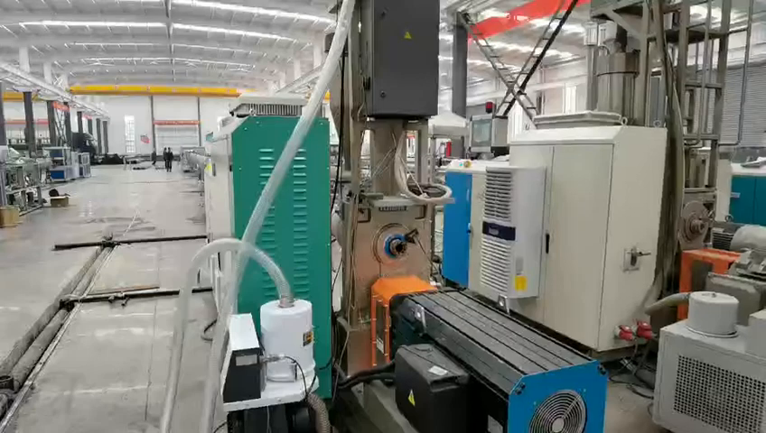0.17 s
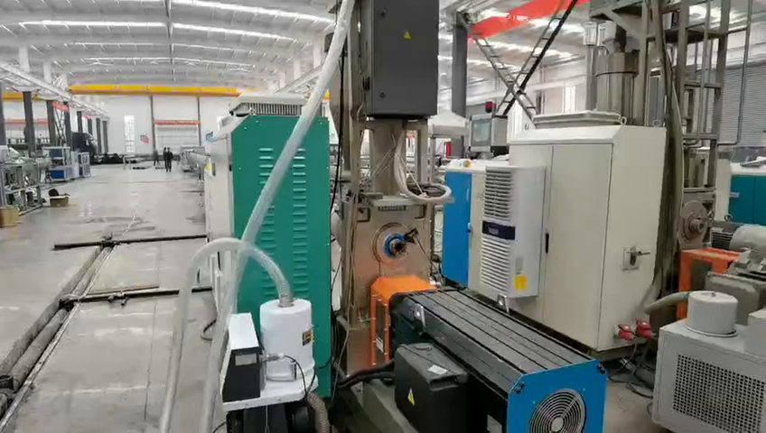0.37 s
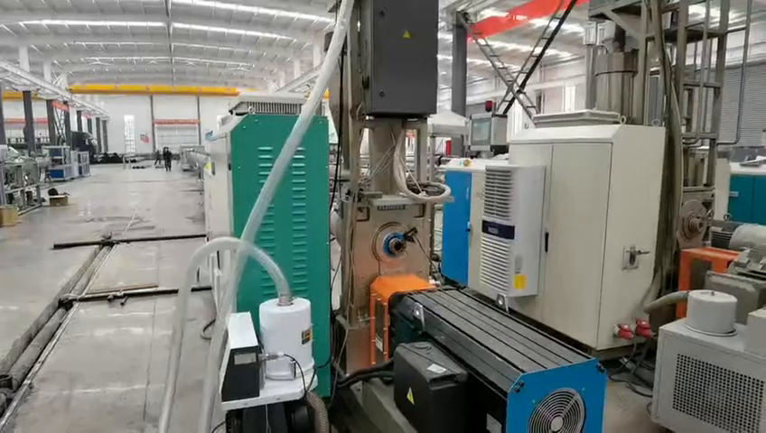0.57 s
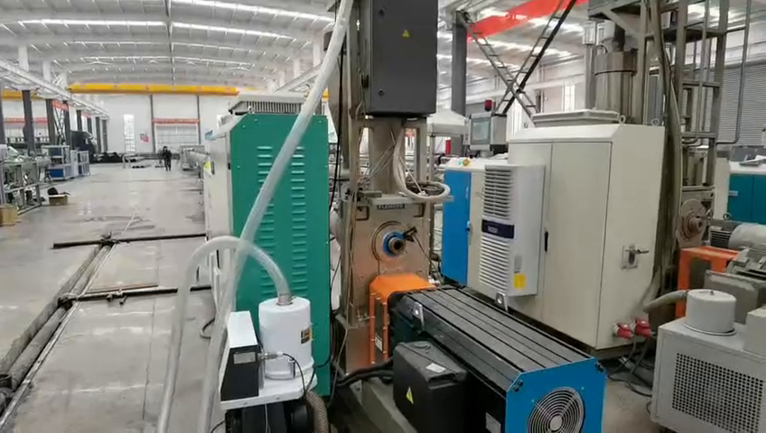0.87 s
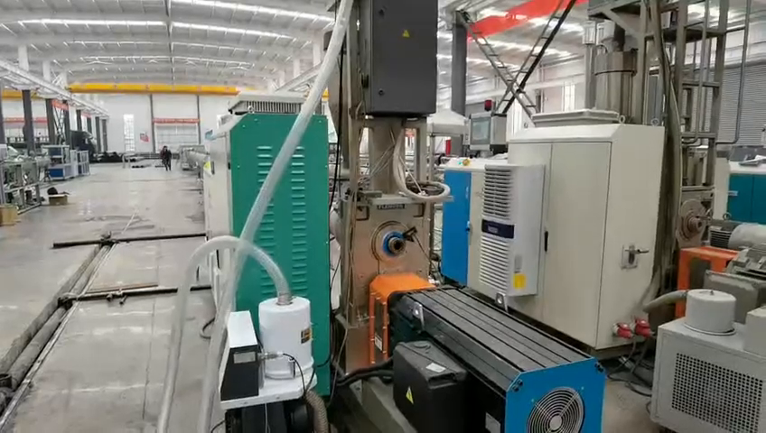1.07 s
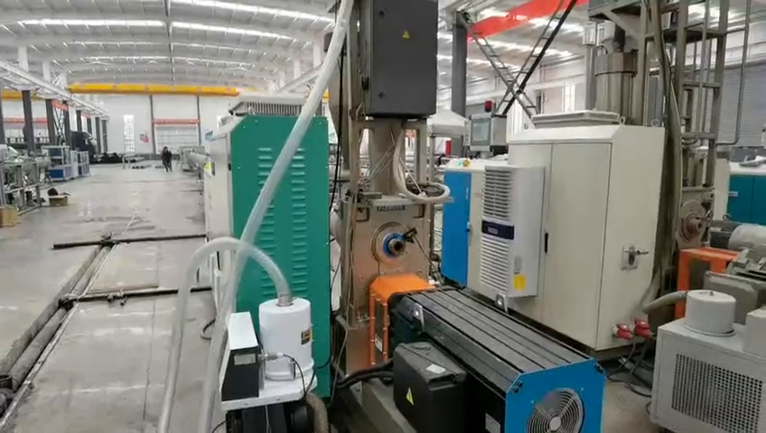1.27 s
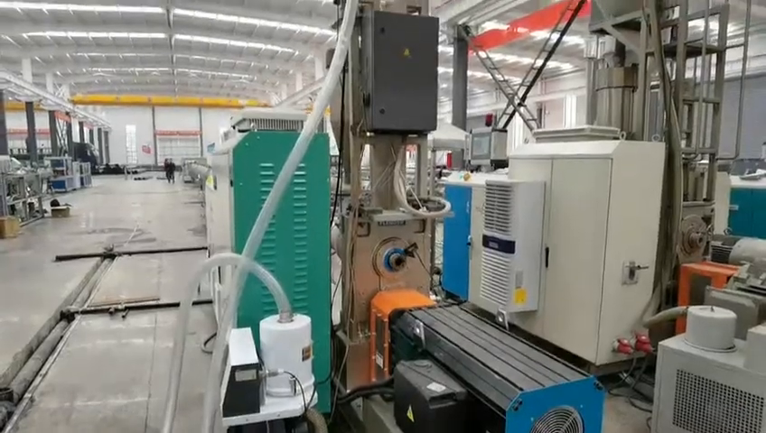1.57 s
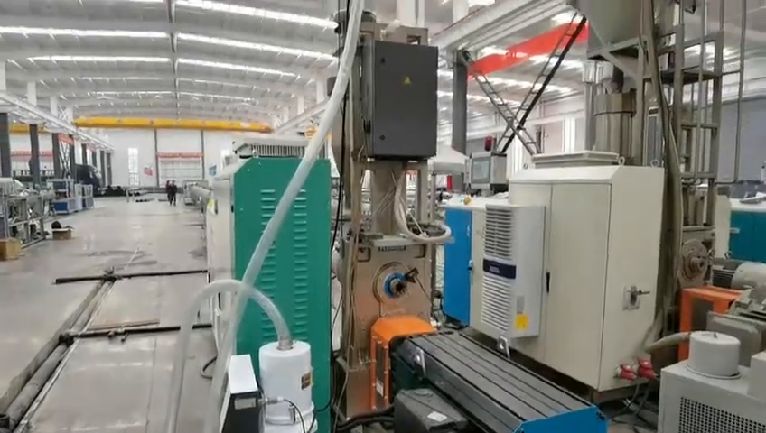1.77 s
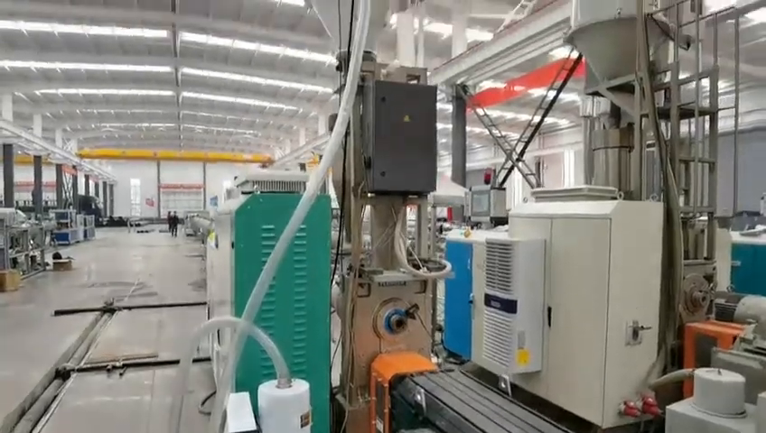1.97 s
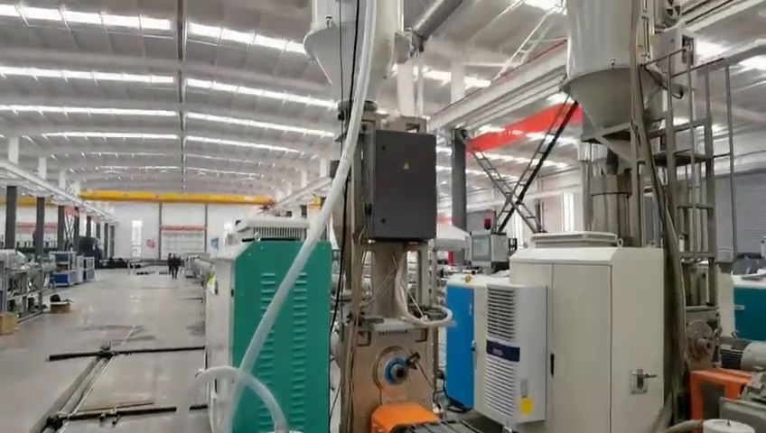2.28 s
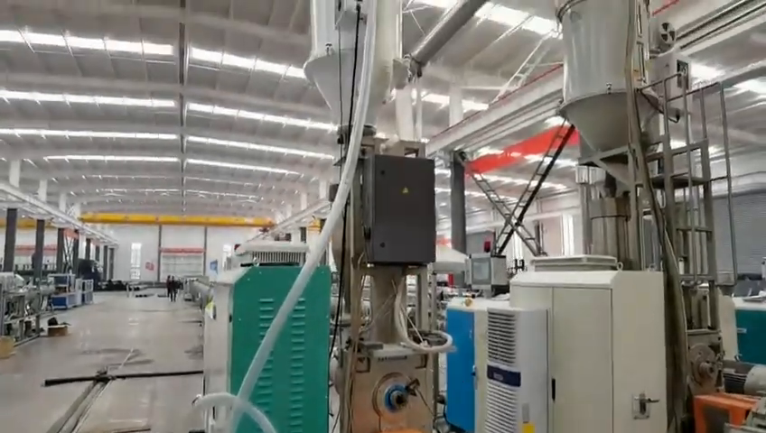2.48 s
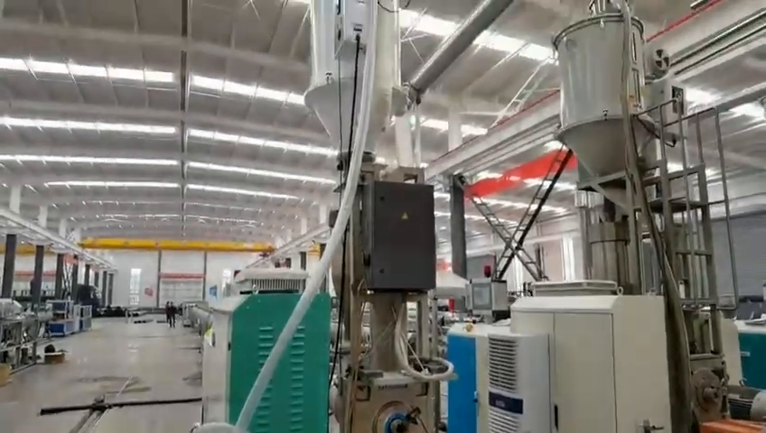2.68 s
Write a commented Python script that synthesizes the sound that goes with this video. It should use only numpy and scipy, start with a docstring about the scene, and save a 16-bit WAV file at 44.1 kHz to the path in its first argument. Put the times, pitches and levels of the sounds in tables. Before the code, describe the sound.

A large extrusion machine runs close by, cutting in after a brief silence. Its motor gives a steady, many-toned whine with a light sizzle, over humming fans, rushing air and factory hall rumble. Single tones swell and fade.

```python
"""A steady, many-toned whine over hum and rumble cuts in after a brief silence: a pipe extruder, close by.
Its inverter-fed motor sings in sidebands round multiples of the switching frequency and its frame sizzles.
Fans hum, cooling air rushes, other machines add faint tones and the factory hall rumbles.
The microphone tilts upward midway, so single tones swell and fade."""
import sys
import numpy as np
from scipy.fft import rfft, irfft, next_fast_len
from scipy.io import wavfile
from scipy.ndimage import map_coordinates

SR = 44100
rng = np.random.default_rng(int(sys.argv[2]) if len(sys.argv) > 2 else 0)


def wav_out(sig):
    """Save sig, one row per channel (or a flat mono array), as 16-bit PCM at SR to the path in sys.argv[1]."""
    wavfile.write(sys.argv[1], SR, np.round(np.clip(np.atleast_2d(sig).T, -1, 1) * 32767).astype(np.int16))


N = 125244
TIME_S = np.arange(N) / SR
SWITCH_HZ, SUPPLY_HZ = 2000, 35.1

# cooling air spectrum: (frequency [Hz], density [dB per Hz])
AIR_SPECTRUM = [(150, -99), (450, -59.5), (800, -63), (1650, -61.5), (1950, -59.5), (2500, -61.5),
                (3000, -59.5), (3300, -63.5), (3700, -63.5), (4700, -61), (6500, -61.5), (7500, -61.5),
                (8600, -57.5), (9050, -62.5), (10100, -61.5), (11300, -76.5), (12100, -76), (13000, -85),
                (14800, -74.5), (16000, -78)]
# interchannel phase: (frequency [Hz], right lead [rad])
RIGHT_LEAD = [(100, .08), (500, 0.38), (770, 0.32), (1100, 1.56), (2100, 4.7)]


def amp(db):
    """Decibels to gain."""
    return 10 ** (np.asarray(db) / 20)


def along(points, hz):
    """(frequency [Hz], value) points read on a log axis."""
    knots_hz, values = np.transpose(points)
    return np.interp(np.log(hz + 1), np.log(knots_hz + 1), values)


def curves(rows):
    """One value per sample for each column after the time."""
    knots_s, *columns = np.transpose(rows)
    return [np.interp(TIME_S, knots_s, column) for column in columns]


def wobble(rate_hz):
    """Smooth random curve, rate_hz knots a second."""
    knots = rng.standard_normal(1024)
    coarse = np.arange(0, N + 64, 64)
    spline = map_coordinates(knots, [coarse * rate_hz / SR + 2], mode="mirror")
    return np.interp(np.arange(N), coarse, spline)


def pan(db):
    """Channel gains of unit mean power; pan is left minus right [dB]."""
    gains = amp(np.array([np.atleast_1d(db), -np.atleast_1d(db)]) / 2)
    return gains / np.sqrt(np.mean(gains ** 2, axis=0))


def tilt():
    """Upward microphone tilt, 0 to 1."""
    span_s = (1.6, 1.77)  # (start [s], end [s])
    return np.interp(TIME_S, span_s, (0, 1))


def tone(hz, db, pan_db, sway_db, jitter_rad, jitter_hz, start_rad=None):
    """Machine tone after the hall: level and phase wander, channels out of step."""
    diffuse = start_rad is None and hz > 1500  # either channel may lead
    start_rad = 2 * np.pi * rng.random() if start_rad is None else start_rad
    phase = 2 * np.pi * hz * TIME_S + start_rad + jitter_rad * wobble(jitter_hz)
    skew = -min(along(RIGHT_LEAD, hz), np.pi / 2) / 2
    skew *= rng.choice([-1, 1]) if diffuse else 1
    level = np.sqrt(2) * amp(db + sway_db * wobble(4.17))
    return level * pan(pan_db) * np.sin([phase + skew, phase - skew])


def rush(spectrum):
    """Stereo noise of the given density, nearly mono in the bass."""
    coherence = [(200, 0.98), (380, 0.89), (750, 0.25), (1100, 0.46), (2100, 0.44), (3000, .03)]  # (frequency [Hz], left-right coherence [0..1])
    balance = [(100, 1.5), (400, 1.5), (1000, 5), (2000, 8), (3200, 3.5), (6000, 3.5), (8000, 2),
               (10000, 11), (12000, 11.5)]  # (frequency [Hz], pan [dB])
    size = next_fast_len(N + 8192)
    hz = np.fft.rfftfreq(size, 1 / SR)
    width_rad = np.arccos(np.clip(along(coherence, hz), -1, 1)) / 2
    mid, side = rfft(rng.standard_normal((2, size))) * [np.cos(width_rad), np.sin(width_rad)]
    lead = np.exp(.5j * along(RIGHT_LEAD, hz))
    stereo = np.array([(mid + side) / lead, (mid - side) * lead]) * pan(along(balance, hz))
    return irfft(stereo * amp(along(spectrum, hz)), size)[:, :N] * np.sqrt(SR / 2)


def inverter():
    """Switching sidebands, buzzing at twice the supply rate when in step, plus one plain tone."""
    clusters = [(1, -5), (2, -4), (3, -3), (4, -6)]  # (centre [x switching rate], lowest sideband [x supply rate])
    levels_db = [
        [-40, -33, -34, -44, -37.5, -30.5, -44],
        [-47, -44, -46, -44, -49],
        [-38.5, -44, -41, -43, -38.5],
        [-45, -42, -37, -31, -29.5, -48, -48, -39],
    ]  # per cluster: sideband levels [dB], low to high
    tilts_db = [
        [-1, -4.5, -5, -6, 4, -6, 2],
        [0, -3, 0, -2, 0],
        [-6, -3, 1, -3, -2],
        [0, 0, 5, -6, -7, 0, 0, 3],
    ]  # per cluster: sideband changes at full tilt [dB]
    pans_db = [8, 3.3, 1.5, 21]  # per cluster: pan [dB]
    scatters_rad = [.75, 2.5, 2.5, 1.6]  # per cluster: start phase spread [rad]
    recession = [(1.4, 0), (2.25, -1), (2.8, -4)]  # lowest cluster: (time [s], gain [dB])
    ring = [(.3, -36.5), (2.2, -40), (2.45, -43), (2.65, -33), (2.84, -33)]  # plain tone: (time [s], level [dB])
    (recession_db,), (ring_db,) = curves(recession), curves(ring)
    out, up = np.zeros((2, N)), tilt()
    for i, (multiple, lowest) in enumerate(clusters):
        for k, (db, tilt_db) in enumerate(zip(levels_db[i], tilts_db[i])):
            hz = multiple * SWITCH_HZ + (lowest + 2 * k) * SUPPLY_HZ
            level_db = db + tilt_db * up + recession_db * (multiple == 1)
            out += tone(hz, level_db, pans_db[i], sway_db=1.2, jitter_rad=.25, jitter_hz=12,
                        start_rad=scatters_rad[i] * rng.normal())
    return out + tone(2 * SWITCH_HZ, ring_db, pan_db=-1, sway_db=1, jitter_rad=.17, jitter_hz=7.3)


def second_drive(carrier_hz=9999.5, step_hz=42.8, carrier_db=-32, sideband_db=-38.5, tilt_db=-1.5):
    """High switching carrier with one sideband on each side."""
    out = np.zeros((2, N))
    for k in (-1, 0, 1):
        db = (sideband_db if k else carrier_db) + tilt_db * tilt()
        out += tone(carrier_hz + k * step_hz, db, pan_db=20, sway_db=.8, jitter_rad=.3, jitter_hz=25)
    return out


def motor(whistle_hz=5386, shaft_hz=21.5, flutter_depth=.2):
    """Magnetic slot and frame tones; the strongest whistle carries sidebands at the shaft rate."""
    slot_tones = [(2437, -39.5, 5, -7), (2521, -43.5, 7, -3), (2661, -38.5, 9, 1), (3046, -40, 9, -6),
                  (3655, -43.5, 4, -4), (4135, -44, 6, -2), (4264, -39.5, 10, 1), (4614, -39.5, 9, 4),
                  (4696, -47, 10, 8), (4766, -44, 10, 5), (4839, -48, 6, 6), (4871, -34.5, 6, -9),
                  (5129, -46, 3, -1), (5520, -43, 5, -4), (5654, -41, 7, -2), (6661, -44, 6, 0),
                  (6872, -41, 9, 3), (7303, -44, 6, -2), (7910, -41, 3, 0), (8090, -38, 7, -2),
                  (8696, -35, 3, -3), (8766, -41, 5, 2), (8792, -45, 7, -2), (9731, -44, 12, -6),
                  (9743, -40, 11, -4), (9774, -44, 9, -4), (10257, -42, 10, -1)]  # (frequency [Hz], level [dB], pan [dB], change at full tilt [dB])
    whistle = [(.3, -28, 6), (1.15, -27, 6), (1.5, -24.3, 1), (1.68, -26, 0), (1.87, -25, -1),
               (2.08, -28.5, -3), (2.2, -29.5, -2), (2.4, -29.5, 1), (2.6, -32.5, 4), (2.8, -37, 7)]  # (time [s], level [dB], pan [dB])
    out, up = np.zeros((2, N)), tilt()
    for hz, db, pan_db, tilt_db in slot_tones:
        out += tone(hz, db + tilt_db * up, pan_db, sway_db=1.2, jitter_rad=.32, jitter_hz=6.17)
    db, pan_db = curves(whistle)
    shaft_rad = 2 * np.pi * shaft_hz * TIME_S
    flutter = 1 + flutter_depth * (np.cos(shaft_rad) + np.cos(2 * shaft_rad))
    return out + flutter * tone(whistle_hz, db, pan_db, sway_db=.7, jitter_rad=.25, jitter_hz=14)


def blower(hz=514):
    """Overhead blower tone; dips, then grows as the microphone tilts up."""
    course = [(.3, -40, 6), (.7, -38, 9), (1.2, -48, 3), (1.9, -36.5, -3), (2.5, -36.5, 3), (2.8, -31, 1)]  # (time [s], level [dB], pan [dB])
    db, pan_db = curves(course)
    return tone(hz, db + 2.2 * wobble(16), pan_db, sway_db=.8, jitter_rad=.35, jitter_hz=14)


def fans(throb_hz=611, throb_sigma_s=.022):
    """Unsteady blade and gear tones, plus a hum that throbs unevenly."""
    blade_tones = [(279, -38, 4, 1), (300, -39, 5, -3), (348, -43, 2, 4), (398, -30.5, 4, -3.5),
                   (608.4, -41.5, 4, 1), (619.3, -44, 4, 1), (767, -42, 8, -3), (796, -42.5, 9, -3),
                   (815, -45, 5, -3), (974, -39, 9, -4), (1030, -42, 6, -3), (1103, -44, 8, -2),
                   (1218, -43, 4, 3), (1246, -44, 6, -3), (1304, -44, 9, -4), (1543, -44, 11, -4),
                   (1592, -44, 9, -1)]  # (frequency [Hz], level [dB], pan [dB], change at full tilt [dB])
    throbs = [(.35, -32), (.82, -32.5), (1.1, -33.5), (1.28, -30.5), (1.38, -31), (1.57, -34), (1.74, -30),
              (1.96, -33), (2.31, -28), (2.47, -28.5), (2.76, -30.5)]  # (time [s], peak level [dB])
    out, up = np.zeros((2, N)), tilt()
    for hz, db, pan_db, tilt_db in blade_tones:
        level_db = db + tilt_db * up + 1.8 * wobble(14)
        out += tone(hz, level_db, pan_db, sway_db=.8, jitter_rad=.36, jitter_hz=12)
    swell = sum(amp(db) * np.exp(-.5 * ((TIME_S - s) / throb_sigma_s) ** 2) for s, db in throbs)
    return out + swell * tone(throb_hz, 0, pan_db=4, sway_db=-2.5, jitter_rad=1, jitter_hz=14)


def other_machines(count=150, over_air_db=9, spread_db=5.5):
    """Faint mid and treble tones, levels set relative to the cooling air's density."""
    tones = zip(rng.uniform(1200, 10800, count), rng.normal(over_air_db, spread_db, count))
    return sum(tone(hz, db + along(AIR_SPECTRUM, hz), pan_db=0, sway_db=1.5, jitter_rad=.5, jitter_hz=6)
               for hz, db in tones)


def hall_rumble(surge_sigma_s=.023):
    """Low hall noise with brief surges, over a deeper band that slowly grows."""
    rumble_spectrum = [(70, -72), (130, -45), (170, -51), (210, -44), (250, -51), (380, -55), (550, -62),
                       (900, -68.5), (2000, -120)]  # (frequency [Hz], density [dB per Hz])
    deep_spectrum = [(28, -86), (44, -52.5), (58, -56.5), (105, -52.5), (170, -88.5)]  # (frequency [Hz], density [dB per Hz])
    rumble_gain = [(.3, -2), (.85, -1), (1.25, -3), (1.6, -1.5), (2.1, -1), (2.75, 1)]  # (time [s], gain [dB])
    deep_gain = [(.4, -2.5), (1.2, 1), (2.2, 1.5), (2.8, 3)]  # (time [s], gain [dB])
    surges = [(.32, 3.5), (.47, 5), (.71, 2.5), (1.1, 3.5), (1.38, 4.5), (1.62, 6.5), (1.72, 2.5),
              (1.99, 4), (2.18, 4), (2.61, 4)]  # (time [s], peak boost [dB])
    (rumble_db,), (deep_db,) = curves(rumble_gain), curves(deep_gain)
    surge_db = sum(db * np.exp(-.5 * ((TIME_S - s) / surge_sigma_s) ** 2) for s, db in surges)
    return rush(rumble_spectrum) * amp(rumble_db + surge_db) + rush(deep_spectrum) * amp(deep_db)


def supply_pulse(depth):
    """Gain pulsing at twice the supply frequency."""
    return 1 + depth * np.sin(2 * np.pi * 2 * SUPPLY_HZ * TIME_S)


def cooling_air():
    """Broadband air rush, lightly pulsing."""
    return rush(AIR_SPECTRUM) * supply_pulse(depth=.096)


def frame_sizzle():
    """Motor frame sizzling near 2 and 8 kHz in time with the supply."""
    spectrum = [(1500, -110), (1780, -71.5), (1930, -61), (2150, -63.5), (2400, -64.5), (3000, -110),
                (7000, -100), (7700, -70.5), (7990, -47), (8200, -60.5), (8500, -58.5), (8730, -65),
                (9000, -86), (9800, -110)]  # (frequency [Hz], density [dB per Hz])
    return rush(spectrum) * supply_pulse(depth=.18)


def scene():
    """All machinery at once; overall level and balance drift slightly."""
    drift = [(.23, -0.5, -2.5), (.33, 1.5, -2.5), (.45, -1.5, 1.5), (1.4, -1.5, 2), (2, -0.5, 1.5),
             (2.8, -0.5, 1.5)]  # (time [s], gain [dB], pan [dB])
    db, pan_db = curves(drift)
    tones = inverter() + second_drive() + motor() + blower() + fans() + other_machines()
    noise = hall_rumble() + cooling_air() + frame_sizzle()
    return (tones + noise) * amp(db) * pan(pan_db)


def record(dry, start_s=.2227, fade_s=.014, cutoff_hz=16000):
    """Silence, a fast fade-in and a brick-wall low-pass."""
    fade = 1 - np.exp(-np.maximum(TIME_S - start_s, 0) / fade_s)
    size = next_fast_len(N + 8192)
    passband = np.fft.rfftfreq(size, 1 / SR) < cutoff_hz
    return irfft(rfft(dry * fade, size) * passband, size)[:, :N]


dry = scene()
out = record(dry)
wav_out(out)
```